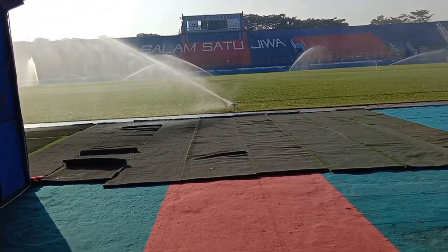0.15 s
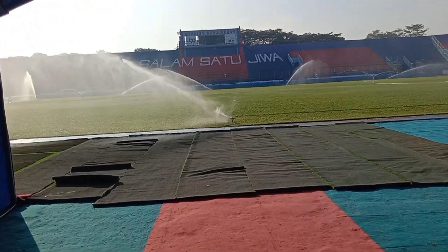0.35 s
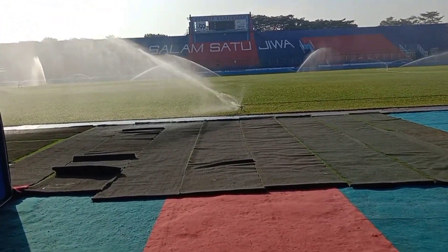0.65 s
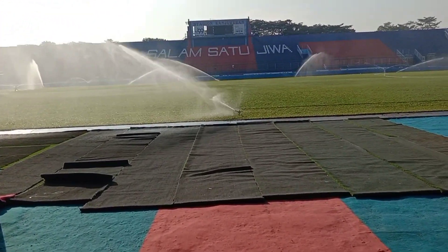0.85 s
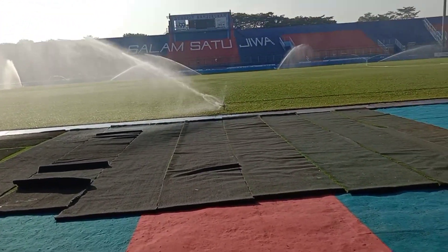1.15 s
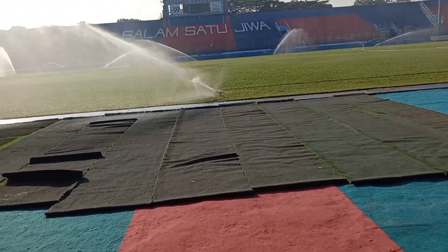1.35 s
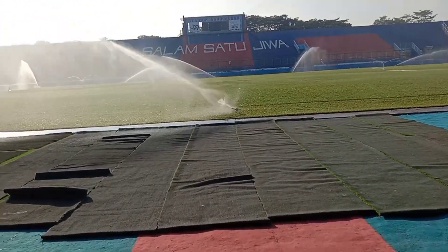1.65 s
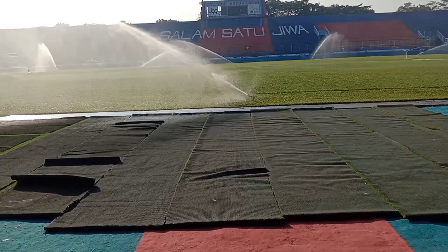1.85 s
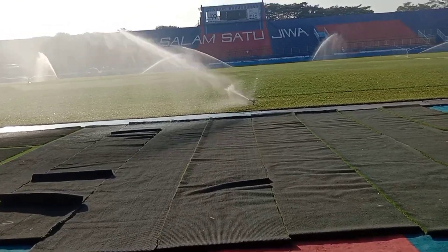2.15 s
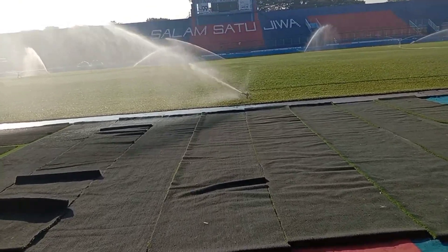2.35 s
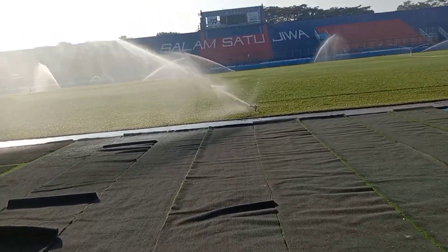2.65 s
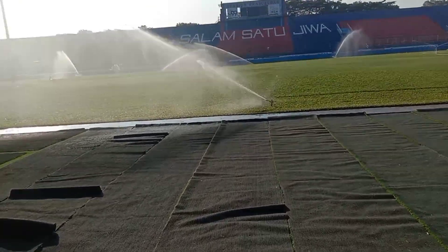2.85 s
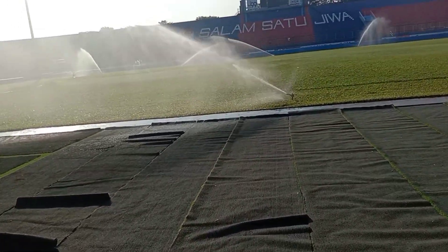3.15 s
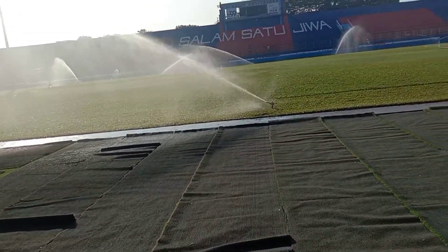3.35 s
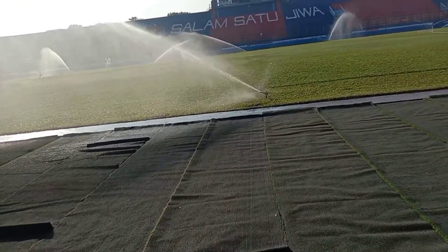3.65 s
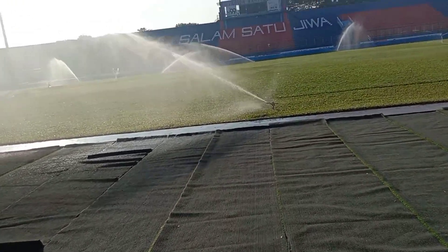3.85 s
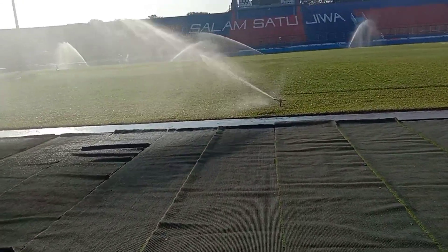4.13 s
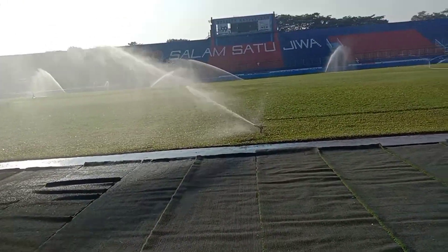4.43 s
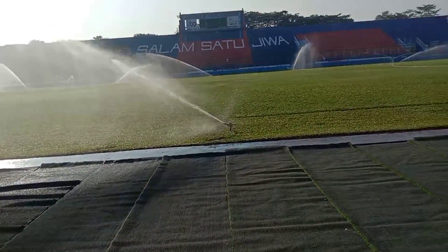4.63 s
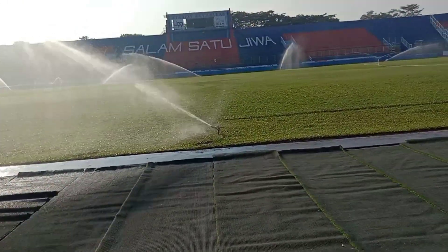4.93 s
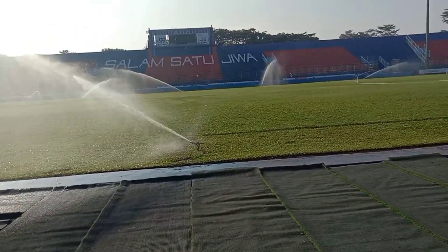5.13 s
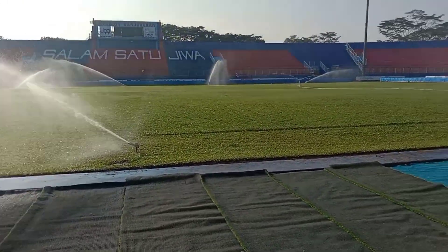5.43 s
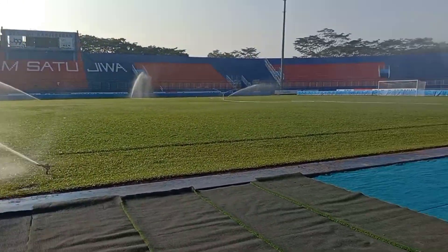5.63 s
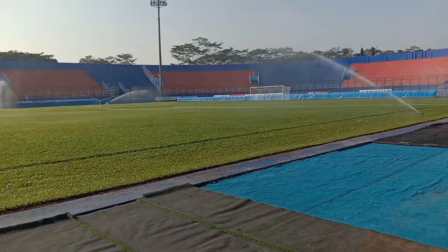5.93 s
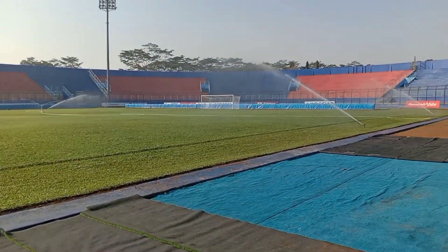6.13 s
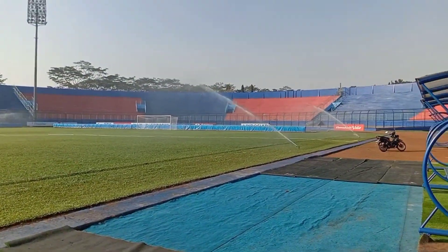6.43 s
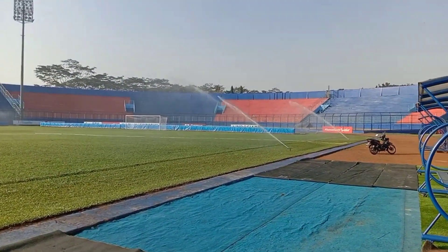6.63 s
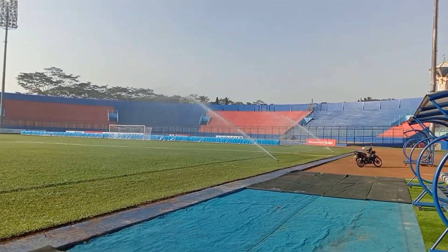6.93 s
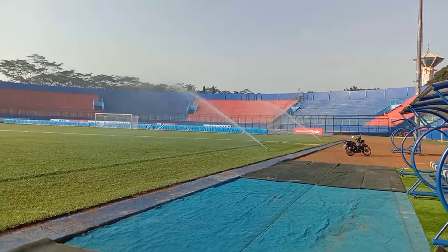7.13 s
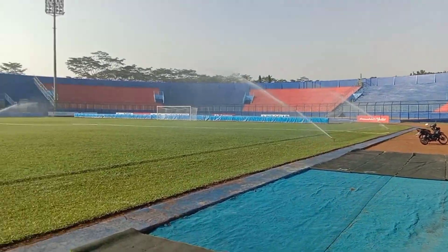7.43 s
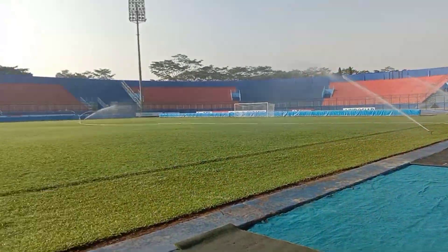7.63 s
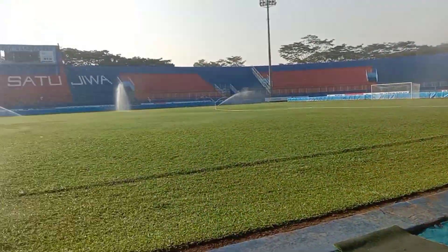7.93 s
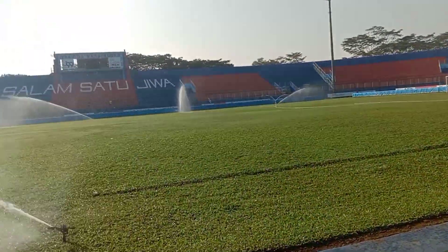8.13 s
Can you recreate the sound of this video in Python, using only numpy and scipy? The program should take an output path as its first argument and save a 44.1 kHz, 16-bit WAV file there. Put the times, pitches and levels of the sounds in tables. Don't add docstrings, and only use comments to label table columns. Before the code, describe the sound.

Steady, crisp sprinkler ticks run throughout, each a burst of spray about forty milliseconds long with a faint metal tick and diffuse reverberation from the stands. Fine water patter fills the gaps. A distant engine fades in early as a low throbbing hum over traffic rumble, with a far sprinkler spitting twice a second. Small wind puffs and dull handling rubs touch the handheld microphone; the near strokes dip, then surge at the end.

```python
import sys
import numpy as np
from scipy import signal
from scipy.fft import rfft, irfft
from scipy.io import wavfile

SR = 44100
rng = np.random.default_rng(int(sys.argv[2]) if len(sys.argv) > 2 else 0)


def ratio_of_db(decibels):
    return 10 ** (np.asarray(decibels, float) / 20)


def store_pcm(level_fs):
    pcm = np.round(np.clip(level_fs, -1, 1) * 32767).astype(np.int16)
    wavfile.write(sys.argv[1], SR, np.atleast_2d(pcm).T)


N = 365148

# t/s, pose (-1 in the dugout door, 0 ahead, 1 aside, 2 close)
MIC_TURN = [(0, -1.6), (2.3, -1), (3.3, -0.11), (4.4, -0.00036), (5.0, 0.2), (5.6, 0.46), (6.3, 0.88),
            (7.2, 1.18), (7.55, 1.83), (8.28, 2.5)]
NEAR_BALANCE = [
    (-20.5, -17, -1.14, -4.5, -18.5),
    (-19.5, -11, -2.1, -8, -17),
    (-20.5, -12.5, -0.7, -11, -8),
    (-6.1, -2.3, -16.5, -14, -20),
    (-16.5, -12.5, -1.3, -8, -18.5),
]
# t/s, level/dB, order cancelled by the echo off the stands, load/dB
ENGINE_HEARD = [(2.1, -69, 5.1, -20), (2.85, -53, 5.6, -12.5), (3.15, -42.5, 5.0, -3),
                (3.36, -43, 7.0, -4.5), (3.75, -45, 7.0, -1), (4.05, -45, 8.0, -7.5), (4.26, -43, 6.0, -7),
                (4.65, -42, 5.8, -17.5), (5.0, -47, 5.0, -9.5), (5.18, -46, 5.2, -15),
                (5.36, -45, 6.0, -34), (5.7, -44.5, 5.0, -12.5), (6.1, -44, 4.7, -6), (6.6, -42, 4.2, -22),
                (7.1, -43, 4.5, -26), (7.45, -46, 5.0, -25), (7.8, -48.5, 4.1, -17),
                (8.25, -43.5, 5.0, -17)]


def rms_one(x):
    return x / np.sqrt(np.mean(x ** 2) + 1e-20)


def filtered(x, order, hz, kind):
    return signal.sosfilt(signal.butter(order, hz, kind, fs=SR, output="sos"), x)


def in_time(rows):
    s, *columns = np.transpose(rows)
    return [np.interp(np.arange(N) / SR, s, c) for c in columns]


def by_pose(table, pose):
    poses = [-1, 0, .4, 1, 2]
    return [np.interp(pose, poses, c) for c in np.transpose(table)]


def at_hz(points, hz):
    f, level_db = np.transpose(points)
    return np.interp(np.log(hz), np.log(f), level_db)


def drift(rate):
    r = np.exp(-80 * np.pi * rate / SR)
    slow = signal.lfilter([1], [1, -2 * r, r * r], rng.standard_normal(N // 40 + 2002))[2000:]
    return np.interp(np.arange(N) / 40, np.arange(len(slow)), rms_one(slow))


def ring(clicks, hz, t60):
    r = ratio_of_db(-60 / (t60 * SR))
    w = 2 * np.pi * hz / SR
    return signal.lfilter([0, np.sin(w)], [1, -2 * r * np.cos(w), r * r], clicks + 1e-18)


def third_octaves(low_hz, high_hz, whites):
    edges = low_hz * 2 ** np.arange(0, np.log2(high_hz / low_hz) + .2, 1 / 3)
    for k, (low, high) in enumerate(zip(edges, edges[1:])):
        yield np.sqrt(low * high), filtered(whites[k % 2], 2, [low, high], "band")


def marks(times, levels_db):
    out = np.zeros(N)
    at = np.round(np.asarray(times) * SR).astype(int)
    out[np.clip(at, 0, N - 1)] = ratio_of_db(levels_db)
    return out


def near_strokes():
    # t/s, peak level/dB
    walking = [(0.053, -20.5), (0.2147, -18.5), (0.379, -19.5), (0.5372, -20), (0.7012, -19.5),
               (0.8638, -21), (1.0145, -17.5), (1.1746, -20.5), (1.3355, -19), (1.498, -18.5),
               (1.6607, -19), (1.8234, -18.5), (1.9852, -19), (2.15, -19.5), (2.3123, -19), (2.472, -17.5),
               (2.6383, -17.5), (2.7992, -18.5), (2.9632, -16.5), (3.1232, -16), (3.275, -17.5),
               (3.4358, -17.5), (3.5932, -17), (3.756, -16.5), (3.9222, -16), (4.0817, -18)]
    # t/s, peak level/dB
    panning = [(4.2369, -15.5), (4.3933, -15.5), (4.5461, -14.5), (4.7062, -15), (4.8718, -15.5),
               (5.031, -16), (5.1974, -16.5), (5.3575, -19.5), (5.5235, -18), (5.6811, -16.5),
               (5.8498, -17.5), (6.0095, -17), (6.1633, -20), (6.324, -20.5), (6.485, -23), (6.6438, -24.5),
               (6.7978, -21), (6.9533, -21), (7.108, -20.5), (7.2698, -16.5), (7.4301, -10), (7.593, -7.5),
               (7.7466, -8), (7.9099, -7), (8.0648, -5), (8.2272, -6)]
    s, peak_db = np.transpose(list(walking) + list(panning))
    lead_s = .0008
    return s - lead_s, peak_db, np.interp(s, *np.transpose(MIC_TURN))


def stroke_shape(train):
    # t/s after onset, level/dB
    crossing = [
        (-.008, -29.5),
        (-.001, -13.5),
        (.003, 1.5),
        (.007, -5),
        (.018, -6.5),
        (.026, -5),
        (0.029, -5.5),
        (.035, -30),
        (.045, -40),
    ]
    s, level_db = np.transpose(crossing)
    shape = ratio_of_db(np.interp(np.arange(-.01, .05, 1 / SR), s, level_db))
    return signal.oaconvolve(train, shape)[int(.01 * SR):][:N]


def droplets(per_s, size_db):
    sizes = ratio_of_db(size_db * np.minimum(rng.exponential(1, N), 5)) * rng.choice([-1, 1], N)
    return rms_one(sizes * (rng.random(N) < per_s / SR))


def spits(s, peak_db, balance, turn):
    edges_hz = [1600, 2600, 4400, 6400, 9600, 15600]
    # f/Hz, level/dB per Hz
    ahead = [(760, -42), (1300, 3), (1640, -17.5), (2090, -15.5), (3170, -18.5), (4440, -8), (5480, 6),
             (6280, -13.5), (7280, -10.5), (8260, -13.5), (10200, -28), (11800, -15), (13800, -23.5),
             (14900, -28), (16000, -5)]
    # f/Hz, level/dB per Hz
    aside = [(760, -39), (1300, -57), (1640, -4), (2060, 8.5), (3040, -4), (4040, -17), (5040, -12.5),
             (6280, -42), (6830, -2.5), (7200, -5), (8000, -23), (11200, -8.5), (13000, -90), (15000, -6),
             (16000, -25)]
    # f/Hz, level/dB per Hz
    close = [(760, -45), (1300, 4), (1400, -21), (2170, -8), (2570, -21.5), (4170, -28), (5540, 7),
             (6760, -18), (8000, -30), (9360, -34.5), (10800, -23.5), (12200, -29), (13700, -32),
             (15200, -25), (16000, -34)]
    hz = np.fft.rfftfreq(N, 1 / SR) + 1
    turn = np.clip(turn, 0, 2)
    drops = rfft(droplets(per_s=9000, size_db=2.5))
    colours = [irfft(drops * ratio_of_db(at_hz(c, hz)), N) for c in (ahead, aside, close)]
    scatter_db = 2.0 * rng.standard_normal((len(s), 5))
    out = 0
    for k, rel_db in enumerate(balance):
        bands = filtered(colours, 3, edges_hz[k:k + 2], "band")
        band = sum(np.clip(1 - abs(turn - j), 0, 1) * rms_one(b) for j, b in enumerate(bands))
        flutter = ratio_of_db(1.8 * drift(150))
        level_db = peak_db + rel_db + (k != 2) * scatter_db[:, k]
        out = out + band * flutter * stroke_shape(marks(s, level_db))
    return out


def near_sprinkler(trim_db):
    s, peak_db, pose = near_strokes()
    return spits(s, peak_db + trim_db, by_pose(NEAR_BALANCE, pose), in_time(MIC_TURN)[0])


def clinks(trim_db):
    # f/Hz, level/dB re stroke, t60/s
    modes = [
        (5566, -16, .035),
        (3720, -27, .09),
        (1270, -29, .12),
    ]
    s, peak_db, pose = near_strokes()
    peak_db = peak_db + by_pose(NEAR_BALANCE, pose)[2] + trim_db
    chance = rng.standard_normal((len(s), 4))
    times = s + .058 + .0015 * chance[:, 3]
    shade_db = 6 * np.clip(pose, 0, 2)
    out = 0
    for k, (hz, db, t60) in enumerate(modes):
        level_db = peak_db + db - (k > 0) * shade_db + 1.0 * chance[:, k]
        out = out + ring(marks(times, level_db), hz, t60)
    return out


def far_sprinkler(trim_db):
    # t/s, peak level/dB
    strokes = [(3.349, -37.5), (3.815, -38), (4.3126, -40.5), (4.7844, -39.5), (5.281, -39), (5.747, -37),
               (6.2425, -34), (6.7075, -33), (7.203, -34.5), (7.6676, -40), (8.1654, -36.5)]
    balance = [-17, -10.5, 2.1, -0.5, 0]
    s, peak_db = np.transpose(strokes)
    pose = np.interp(s, *np.transpose(MIC_TURN))
    aside = np.clip(1 - abs(pose - 1) / 0.74, 0, 1)
    shaded_top_db = balance[4] - 16.5 * aside
    return spits(s, peak_db + trim_db, list(balance[:4]) + [shaded_top_db], 0.032)


def ringing_noise():
    # f/Hz, width/Hz, level/dB
    resonances = [(1246, 200, 12.5), (2090, 600, 6), (2760, 22, 9), (3750, 83, 6), (4560, 100, 0),
                  (5160, 140, 8.5), (5800, 360, 6), (6020, 110, -8), (7200, 250, 6.5), (9300, 78, 3),
                  (9900, 460, -11.5), (13500, 620, -16), (14700, 600, 4)]
    hz = np.fft.rfftfreq(N, 1 / SR)
    colour_db = sum(db / (1 + (2 * (hz - f) / width) ** 2) for f, width, db in resonances)
    return irfft(rfft(rng.standard_normal((2, 2, N))) * ratio_of_db(colour_db), N)


def field():
    # f/Hz, level/dB per Hz
    echo_colour = [(290, -44), (500, -9.5), (784, -3), (1080, -12), (1250, 49), (1360, -10), (3590, 0),
                   (4530, -12), (5630, -3), (16000, -16)]
    # f/Hz, t60/s
    echo_t60 = [(700, 0.38), (2000, 0.41), (5000, 0.39), (12000, 0.2)]
    # f/Hz, level/dB per Hz
    spray_colour = [(180, -42), (300, -6), (994, -7), (1280, -11.5), (1580, 5), (4230, -15), (5430, -4.5),
                    (10000, -6.5), (15000, -20), (16000, -26)]
    # echo level/dB, echo tilt/dB per octave, spray level/dB, spray tilt/dB per octave
    around = [
        (-41.5, 1.44, -52.5, -1.5),
        (-42.5, -0.3, -49.5, 0.1),
        (-43.5, -2, -51, -0.3),
        (-42, 0.5, -51.5, -2),
        (-50.5, -6, -43, -1.5),
    ]
    # wash f/Hz, wash level/dB, port level/dB
    grass_wash = [(2000, -1.9, 1), (2000, -2.5, 1.8), (2070, 3.5, 2), (2020, 5, -1.8), (1450, 3.5, 11.5)]
    pose = in_time(MIC_TURN)[0]
    echo_db, echo_tilt, spray_db, spray_tilt = by_pose(around, pose)
    wash_hz, wash_db, port_db = by_pose(grass_wash, pose)
    power = stroke_shape(marks(near_strokes()[0], 0)) ** 2
    earlier_s = .108
    echo, spray, gust = 0, 0, drift(3.2)
    for hz, (a, b) in third_octaves(301.28, 16000, ringing_noise()):
        octaves = np.log2(hz / 3000)
        r = ratio_of_db(-120 / (at_hz(echo_t60, hz) * SR))
        hanging = 1.2 * r ** (earlier_s * SR)
        tail = np.sqrt(np.abs(signal.lfilter([.002], [1, -r], power, zi=[hanging])[0]))
        lift_db = port_db * np.exp(-(np.log2(hz / 5600) / .25) ** 2)
        echo_band_db = at_hz(echo_colour, hz) + lift_db + echo_tilt * octaves
        echo = echo + a * tail * ratio_of_db(echo_band_db + 2.88 * drift(18.5))
        washed_db = wash_db * np.exp(-(np.log2(hz / wash_hz) / 0.45) ** 2)
        spray_band_db = at_hz(spray_colour, hz) + washed_db + spray_tilt * octaves
        spray = spray + b * ratio_of_db(spray_band_db + .8 * gust + 2.2 * drift(6))
    return ratio_of_db(echo_db) * rms_one(echo) + ratio_of_db(spray_db) * rms_one(spray)


def nearby(x, count):
    # delay/ms, sway/ms, gain
    bounces = [(.9, 0.1, 0.23), (1.7, 0.091, -0.079), (2.9, 0.14, 0.23), (4.6, 0.34, -0.47),
               (7.3, 0.16, 0.28), (11.1, 0.12, -0.11), (15.7, 0.184, 0.2)]
    at, out = np.arange(N), x
    for ms, sway, gain in bounces[:count]:
        delay = (ms + sway * drift(0.71)) * SR / 1000
        out = out + gain * np.interp(at - delay, at, x)
    return out


def engine():
    # t/s, firings/Hz
    speed = [(2.2, 17.6), (2.8, 17.6), (3.04, 18.3), (3.4, 19.95), (3.64, 20.28), (3.9, 19.85),
             (4.12, 20.1), (4.6, 20.2), (5.02, 20.0), (5.2, 19.15), (5.44, 17.95), (5.56, 18.0),
             (5.8, 18.8), (5.92, 18.95), (7.36, 18.85), (8.28, 18.55)]
    # order, level/dB re engine
    strong = [(5, -2.5), (6, 0), (7, 0.2)]
    # order, level/dB
    weak = [(3, -75), (4, -54.5), (8, -61.5)]
    # f/Hz, width/Hz, level/dB
    pipe_modes = [(194, 27, -0.5), (243.8, 11.6, 1.1), (303, 110, -12)]
    per_s = in_time(speed)[0]
    phase = 2 * np.pi * np.cumsum(per_s) / SR + np.pi
    phase = phase + .03 * drift(5.)
    level_db, cancelled, load_db = in_time(ENGINE_HEARD)
    levels = []
    for order, db in strong:
        notch_db = -11 * np.exp(-((round(order) - cancelled) / 0.62) ** 2)
        levels.append((round(order), level_db + db + notch_db))
    for order, db in weak:
        levels.append((round(order), db + 0.17 * (level_db + 39)))
    boom = sum(ratio_of_db(db + 3 + .7 * drift(4.)) * np.cos(k * phase + .3 * drift(1.5)) for k, db in levels)
    bark = 0
    for k in range(9, 18):
        pipe = sum(ratio_of_db(db) / (1 + ((k * per_s - hz) / width) ** 2) ** 1.27 for hz, width, db in pipe_modes)
        bark = bark + pipe * ratio_of_db(1.5 * drift(2.)) * np.cos(k * phase + 1.2 * drift(.9))
    fade_in = np.clip((np.arange(N) / SR - 2.0) / 0.36, 0, 1)
    return fade_in * (boom + ratio_of_db(level_db + load_db - 2.0) * bark)


def rumble():
    # f/Hz, level/dB per Hz
    colour = [(15, -62), (25, -11), (56, -22), (91, 3.5), (168, -0.5), (248, -5), (361, -19), (389, -18.5),
              (500, -12), (650, -48), (1100, -120)]
    bands = third_octaves(24.76, 500, rng.standard_normal((2, N)))
    bass = rms_one(sum(b * ratio_of_db(at_hz(colour, hz) + 2.0 * drift(2.8)) for hz, b in bands))
    town_db, engine_db = -58.5, in_time(ENGINE_HEARD)[0] - 5
    return np.hypot(ratio_of_db(town_db), ratio_of_db(engine_db)) * bass


def wind():
    # t/s, peak level/dB, length/s
    gusts = [(0.015, -64, 0.07), (0.415, -64, 0.037), (0.586, -56.5, 0.062), (0.725, -61, 0.053),
             (1.2, -66, .1), (1.5, -57, 0.089), (2.232, -58, 0.093), (2.835, -63, 0.35), (3.62, -65, 0.09),
             (3.955, -65, .2), (4.715, -60, 0.073), (5.53, -61, 0.26), (6.243, -53, 0.1), (6.55, -56, 0.09),
             (7.536, -51.5, 0.29), (7.97, -49, 0.18), (8.16, -54, 0.055)]
    t = np.arange(N) / SR
    puffs = ratio_of_db(-70.5)
    for s, db, length in gusts:
        puffs = puffs + ratio_of_db(db) * np.exp(-(2 * (t - s) / length) ** 2)
    turbulence = rms_one(filtered(rng.standard_normal(N), 3, [58, 125], "band"))
    return puffs * ratio_of_db(5.5 + 3.2 * drift(3.5)) * turbulence


def bumps():
    # t/s, peak level/dB, f/Hz
    shifts = [(4.283, -45, 280), (4.95, -49, 304), (6.147, -48, 283), (6.697, -48, 326),
              (6.812, -48.5, 338), (7.335, -47.5, 350), (7.423, -57, 372), (7.886, -45.5, 465),
              (8.079, -54, 447)]
    t, out = np.arange(int(.08 * SR)) / SR, np.zeros(N + SR)
    swell = (t / 0.0071) * np.exp(1 - t / 0.0096)
    for (s, peak_db, hz), rub in zip(shifts, rng.standard_normal((len(shifts), len(t)))):
        out[int(s * SR):][:len(t)] += ratio_of_db(peak_db + 1.5) * rms_one(ring(rub, hz, 0.013)) * swell
    return filtered(out[:N], 2, 220, "high")


def floor():
    # f/Hz, level/dB
    mains = [(198, -66), (248, -73.5)]
    t = np.arange(N) / SR
    hum = sum(ratio_of_db(db - 1 + 5.1 * drift(3.5)) * np.sin(2 * np.pi * hz * t) for hz, db in mains)
    hiss = filtered(ringing_noise()[0, 0], 2, 7000, "high")
    return hum + ratio_of_db(-63) * rms_one(hiss)


def scene():
    direct = near_sprinkler(trim_db=-5.5) + far_sprinkler(trim_db=-1.0) + clinks(trim_db=-5.5)
    water = ratio_of_db(-2.1) * nearby(direct, count=3) + ratio_of_db(-4.0) * nearby(field(), count=7)
    return (water + engine() + rumble() + wind() + floor() + bumps())[None]


def low_pass(x):
    return signal.sosfilt(signal.butter(12, 16780, fs=SR, output="sos"), x)


def record(dry):
    top_cut = signal.cheby2(16, 50, 15950, fs=SR, output="sos")
    return low_pass(signal.sosfilt(top_cut, dry))


dry = scene()
out = record(dry)
store_pcm(out)
```